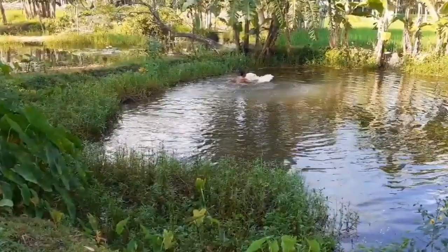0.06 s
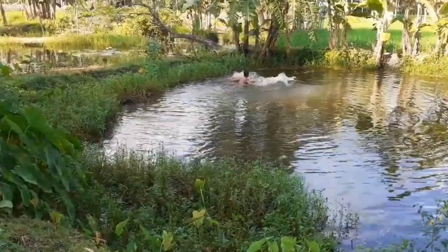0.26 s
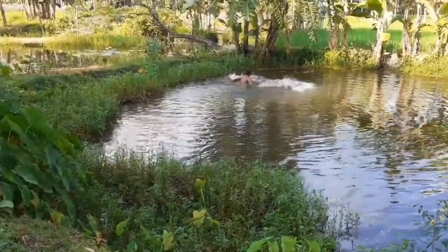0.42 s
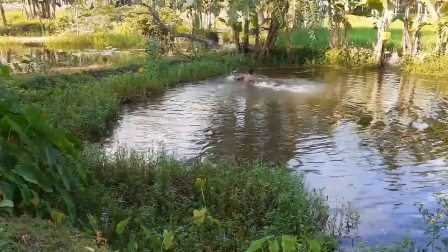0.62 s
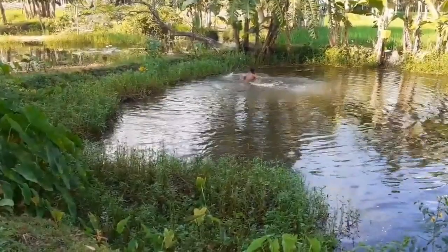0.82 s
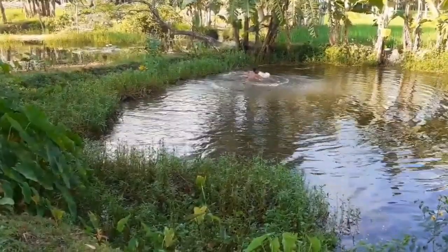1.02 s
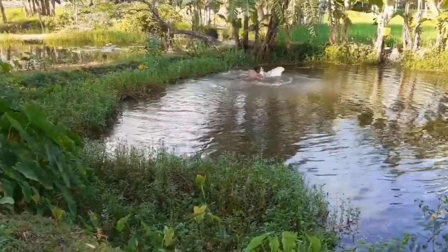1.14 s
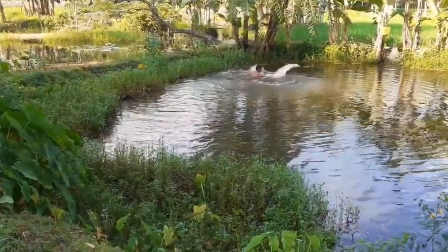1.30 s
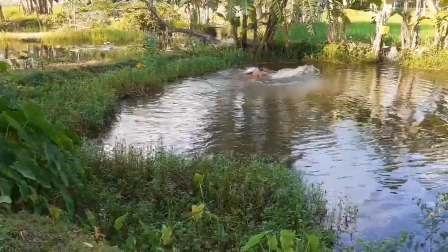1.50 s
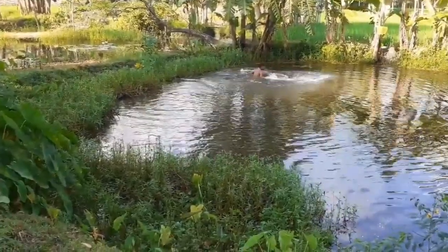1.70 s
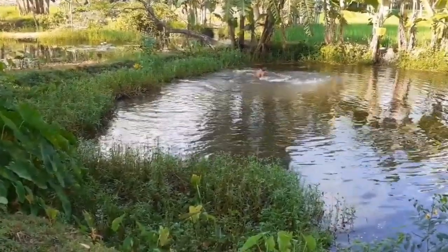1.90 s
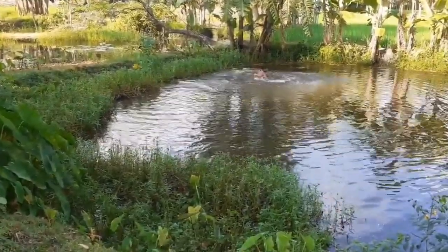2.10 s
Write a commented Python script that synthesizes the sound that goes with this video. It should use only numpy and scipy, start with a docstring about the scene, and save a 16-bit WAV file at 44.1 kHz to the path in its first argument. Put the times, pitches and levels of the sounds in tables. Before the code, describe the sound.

A swimmer splashes across a pond, with continuous churning, gurgles and plops. Near 0.5 seconds a kick makes a hollow thump and spray patters down. From about 0.8 seconds a faint insect trills on the left; another buzzes and a bird whistles upward on the right. A second kick thumps and sprays at 1.6 seconds. The water settles around 2 seconds over a soft low rumble.

```python
"""A swimmer on the far side of a pond, heard in stereo over a low outdoor rumble and a faint echo of trees.
A distant bird calls as the arms churn the water into bubbles. Near half a second a kick traps a pocket
of air that thumps, then throws up spray that patters back. An insect starts trilling on the left;
on the right another buzzes and a bird whistles a rising note that ends in an upward step. The second
kick thumps and sprays at 1.6 s, and the water settles under a last short buzz and a chirp."""
import sys
import numpy as np
from scipy import signal
from scipy.fft import rfft, irfft, next_fast_len
from scipy.io import wavfile
from scipy.ndimage import map_coordinates

SR = 44100
rng = np.random.default_rng(int(sys.argv[2]) if len(sys.argv) > 2 else 0)


def to_wav(s):
    """Save 16-bit WAV."""
    ch = np.atleast_2d(s).T  # columns
    pcm = np.round(np.clip(ch, -1, 1) * 32767)  # PCM
    wavfile.write(sys.argv[1], SR, pcm.astype(np.int16))


N = 94815
TIME = np.arange(N) / SR
LN_1000 = np.log(1000)  # exponent of a 60 dB decay


def air_pockets():
    """Air trapped under the surface rings like a large bubble, its pitch creeping up as it dies."""
    # ringing pockets (time [s], pitch [Hz], level [dB], t60 [s])
    pockets = [(0.204, 185, -46.5, 0.096), (0.316, 116, -50, 0.2), (0.386, 164, -48.5, 0.19),
               (0.427, 257, -28.5, 0.037), (0.439, 268, -20.5, 0.034), (.461, 266, -17, 0.039),
               (.479, 107.3, -30.5, 0.2), (0.504, 329.5, -44, 0.17), (0.749, 192, -54, 0.18),
               (.82, 109, -62.5, 0.32), (.99, 221, -51.5, 0.2), (1.071, 259.5, -43, .13),
               (1.134, 307.5, -40, 0.094), (1.178, 317, -35.5, 0.048), (1.205, 263, -35, 0.072),
               (1.246, 258, -29, 0.032), (1.402, 121, -48.5, 0.1), (1.485, 261, -41, 0.11),
               (1.581, 275.5, -28.5, 0.079), (1.592, 123, -22, 0.032), (1.602, 71.7, -46, 0.31),
               (1.66, 305, -22.5, 0.018)]
    attack_s, rise_per_t60 = 0.01, 0.027
    out = np.zeros(N)
    for start, hz, db, t60 in pockets:
        t = np.maximum(TIME - start, 0)
        envelope = 2 * (1 - np.exp(-t / attack_s)) * np.exp(-LN_1000 * t / t60)
        out += amp(db) * envelope * np.sin(2 * np.pi * hz * t * (1 + rise_per_t60 * t / t60 / 2))
    return out


def spray():
    """Water thrown by each kick patters back in clumps: coarse drops first, fine mist a little later."""
    # showers (time [s], hold [s], drop level [dB], mist lag [s], mist level [dB])
    showers = [(0.521, 0.059, -45, 0.013, -49.5), (1.647, 0.14, -47.5, 0.029, -48.5)]
    # tone of the coarse drops and of the mist (frequency [Hz], gain [dB])
    coarse_colour = [(500, -35), (1300, 6), (1650, -6.5), (2100, 6), (2600, -7), (3400, 4.5), (4300, -2),
                     (5500, -7), (8000, -14), (15500, -9)]
    mist_colour = [(3000, 3), (6000, -2), (8500, -2), (11000, -4.5), (13000, 1.5), (16000, 1.5)]
    coarse_gain = mist_gain = 0
    for start, hold, db, lag, mist_db in showers:
        coarse_gain += amp(db + swell(start, hold, rise_db_s=92, fall_db_s=80.5))
        mist_gain += amp(mist_db + swell(start + lag, hold_s=0.1, rise_db_s=81, fall_db_s=158))
    clumps = amp(3 * wobble(70.04))
    coarse = bubbles(coarse_colour, 1020, 12200, cycles=14, scatter_db=1.5, count=11000)
    mist = bubbles(mist_colour, 2930, 14600, cycles=7.5, scatter_db=3, count=14000)
    return clumps * coarse_gain * coarse + mist_gain * mist


def arm_strokes():
    """The arms stir up deep gurgles, churning bubbles, small drops and fizzing foam."""
    # loudness of each layer of water (time [s], level [dB])
    gurgle_level = [(0, -70), (.22, -58.5), (.3, -60), (.42, -56.5), (.53, -47.5), (.68, -67.5), (.78, -57),
                    (.89, -69), (.99, -56), (1.33, -58.5), (1.48, -52), (1.64, -48), (1.8, -55.5),
                    (1.93, -63.5), (2.05, -79)]
    churn_level = [(0, -60.5), (.23, -52.5), (.35, -56.5), (.5, -46), (.64, -52), (.76, -57), (.85, -64),
                   (.97, -56.5), (1.09, -50), (1.2, -53.5), (1.4, -55), (1.5, -49.5), (1.62, -48),
                   (1.76, -54.5), (1.9, -56), (2.0, -67.5), (2.15, -74.5)]
    drop_level = [(0, -53), (.2, -52), (.48, -55.5), (.68, -52.5), (.88, -62), (1.04, -59.5), (1.15, -56),
                  (1.86, -57), (1.95, -60.5), (2.15, -71)]
    foam_level = [(0, -77), (.34, -60), (.7, -63.5), (.9, -70), (1.25, -64.5), (1.5, -64.5), (1.85, -61.5),
                  (2.1, -77)]
    # tone of each layer (frequency [Hz], gain [dB])
    gurgle_colour = [(40, -50), (70, -10.5), (115, -6.5), (165, -6), (230, 0.5), (320, -0.5), (380, -10),
                     (600, 0)]
    churn_colour = [(250, -25), (390, -16), (490, 0), (650, 3), (850, 3), (980, -3), (1150, -2.5),
                    (1380, 0), (1600, -13.5), (2100, -4.5), (2500, -29), (5000, -53)]
    drop_colour = [(500, -19.5), (1300, 3.5), (1620, -5), (1900, 0), (2200, 2), (2550, -5), (3400, -0.5),
                   (4300, -1.5), (5300, -8), (8000, -16), (15500, -14.5)]
    foam_colour = [(4000, -19), (6500, 0.5), (9000, -1.5), (12500, 5.5), (16000, 6.5)]
    gurgle = bubbles(gurgle_colour, 79.7, 436, cycles=17.7, scatter_db=2.5, count=560)
    churn = bubbles(churn_colour, 365, 2510, cycles=16.8, scatter_db=1.5, count=2200)
    drops = bubbles(drop_colour, 955, 13300, cycles=8.1, scatter_db=-0.5, count=12000)
    foam = bubbles(foam_colour, 3800, 10300, cycles=3.1, scatter_db=2, count=9000)
    layers = [(gurgle, gurgle_level), (churn, churn_level), (drops, drop_level), (foam, foam_level)]
    return sum(layer * amp(curves(level)[0]) for layer, level in layers)


def bubbles(colour, lo_hz, hi_hz, cycles, scatter_db, count):
    """A stereo cloud of bubbles, rms 1: each rings, rises in pitch and fades 60 dB in `cycles` periods."""
    pair = []
    for _ in range(2):
        when, pitch, size, sign = rng.random((count, 4)).T[:, :, None]
        hz = lo_hz + (hi_hz - lo_hz) * pitch
        samples = np.arange(int(cycles * SR / lo_hz) // 2 + 2)
        age = samples * hz / SR / cycles
        gain = np.sign(sign - .5) * amp(-scatter_db * np.log(.01 + size)) * np.sqrt(hz)
        ring = gain * np.sin(2 * np.pi * cycles * age * (1 + age / 10)) * np.exp(-LN_1000 * age)
        slot = np.arange(count)[:, None] + 2 * when - 1  # even spacing with jitter
        start = (slot * N / count).astype(int).clip(0)
        cloud = np.bincount((start + samples).ravel(), ring.ravel(), N)[:N]
        pair.append(unit(cloud))
    return unit(spread(np.array(pair), colour))


def plops():
    """Lumps of water land: each rings one bubble inside a short splash around its pitch."""
    # landings (time [s], level [dB], pitch [Hz])
    landings = [(0.401, -38, 1280), (.44, -39.5, 658), (0.478, -34.5, 1145), (.497, -26, 3440),
                (.522, -37, 3470), (0.677, -35.5, 1203), (.683, -42, 695), (.738, -38.5, 1273),
                (.752, -39.5, 810), (.926, -41, 1136), (1.107, -39.5, 1246), (1.344, -38, 1076),
                (1.49, -41.5, 516), (1.616, -39.5, 431), (1.769, -32, 1890), (1.951, -49, 760),
                (2.043, -51, 1330)]
    ring_cycles, attack_s, splash_gain = 40, 0.0013, 0.56
    out = np.zeros((2, N))
    for start, db, hz in landings:
        t = np.maximum(TIME - start, 0)
        age = t * hz / ring_cycles
        splash_colour = [(hz / 4, -25), (hz, 0), (hz * 2, -12), (hz * 10, -30)]
        splash = unit(spread(rng.standard_normal((2, N)), splash_colour))
        ring = np.sin(2 * np.pi * hz * t * (1 + 0.044 * age))
        envelope = np.exp(-LN_1000 * age) * (1 - np.exp(-t / attack_s))
        out += amp(db) * envelope * (ring + splash_gain * splash)
    return out


def flicks():
    """Handfuls of droplets hit the pond, each in one short hiss."""
    # handfuls (time [s], level [dB], band centre [Hz], left minus right [dB])
    handfuls = [(.343, -59, 13500, 0), (0.631, -49, 4100, 2), (.785, -60, 13500, 0),
                (1.249, -55.5, 3280, -1)]
    out = np.zeros((2, N))
    for start, db, hz, pan_db in handfuls:
        envelope = amp(db + swell(start, hold_s=0, rise_db_s=700, fall_db_s=600))
        out += noise_band(hz, width_hz=.22 * hz) * pan(pan_db) * envelope
    return out


def drop_tick():
    """One drop strikes the surface with a crisp click, right of centre."""
    start_s, level_db, t60_s = 1.2478, -46, .012
    t = TIME - start_s
    envelope = (t >= 0) * amp(level_db) * np.exp(-LN_1000 * np.abs(t) / t60_s)
    return envelope * rng.standard_normal((2, N)) * pan(-4)


def birds():
    """Off to the right, a thin, unsteady rising whistle and a few short, blurred bird notes."""
    # course of the whistle (time [s], pitch [Hz], level [dB])
    course = [(.99, 3880, -75), (1.04, 3890, -71), (1.12, 3920, -66), (1.17, 4080, -76), (1.205, 4220, -61),
              (1.23, 4260, -65), (1.33, 4340, -62), (1.4, 4460, -69)]
    # short blurred notes: distant calls, the whistle's final upward step and a closing chirp
    # (time [s], length [s], pitch [Hz], glide [Hz/s], level [dB])
    short_notes = [(0, .02, 3150, 0, -62), (.07, .06, 3270, 0, -61), (1.402, .045, 4900, 4500, -67),
                   (2.085, .045, 4400, 18000, -76)]
    flutter_db, wander_hz, blur_hz, fade_db_s = 2, 29.4, 160, 500
    hz, db = curves(course)
    first, last = course[0][0], course[-1][0]
    gate_db = swell(first, last - first, fade_db_s, fade_db_s)
    envelope = amp(db + gate_db + flutter_db * wobble(58.9))
    whistle = envelope * tone(hz + wander_hz * wobble(300))
    notes = np.zeros(N)
    for start, length, pitch, glide, level in short_notes:
        note_hz = pitch + glide * np.clip(TIME - start, 0, length) + blur_hz * wobble(700)
        notes += tone(note_hz) * amp(level + swell(start, length, fade_db_s, fade_db_s))
    return (whistle + foliage(notes)) * pan(-5)


def insect_trill():
    """An insect in the leaves on the left: bursts climb and swell, each wing stroke a falling chirp."""
    # bursts (time [s], length [s], level [dB])
    bursts = [(.81, 0.094, -70.5), (0.992, 0.14, -69.5), (1.236, .145, -69), (1.5, .12, -68)]
    pitch_hz, climb_hz, sweep_hz, blur_hz, strokes_per_s = 10450, 130, 900, 130, 102
    stroke = (strokes_per_s * TIME) % 1
    out = np.zeros((2, N))
    for start, length, db in bursts:
        progress = np.clip((TIME - start) / length, 0, 1)
        hz = pitch_hz + climb_hz * progress + sweep_hz * (.5 - stroke) + blur_hz * wobble(1200)
        chirps = unit(np.sin(np.pi * stroke) ** 2 * tone(hz))
        envelope = amp(db + swell(start + length / 2, length / 2, rise_db_s=80, fall_db_s=1200))
        out += foliage(chirps * envelope)
    return out * pan(4.5)


def insect_buzz():
    """Another insect, on the right, gives smooth, high buzzes."""
    # buzzes (time [s], length [s], level [dB], left minus right [dB])
    buzzes = [(1.02, 0.08, -70.5, -5), (1.99, 0.17, -74, -4)]
    out = np.zeros((2, N))
    for start, length, db, pan_db in buzzes:
        envelope = amp(db + swell(start, length, rise_db_s=200, fall_db_s=200))
        out += noise_band(7830, width_hz=70) * pan(pan_db) * envelope
    return out


def foliage(call):
    """Leaves smear a call: the direct sound and a brief scatter, different on each side."""
    t60_s, scatter_db = .03, -6
    t = np.arange(SR // 10) / SR
    tail = rng.standard_normal((2, len(t))) * np.exp(-LN_1000 * t / t60_s)
    paths = (t == 0) + amp(scatter_db) * tail / np.linalg.norm(tail[0])
    return signal.fftconvolve(call[None], paths / np.linalg.norm(paths[0]), axes=1)[:, :N]


def bank_echo(sound):
    """The trees on the bank return a short, diffuse echo, thin in the bass."""
    t60_s, build_s = .35, 0.0032
    t = np.arange(SR // 2) / SR
    tail = rng.standard_normal((2, len(t))) * np.exp(-LN_1000 * t / t60_s) * (1 - np.exp(-t / build_s))
    echo = signal.fftconvolve(sound.mean(0)[None], tail / np.linalg.norm(tail[0]), axes=1)[:, :N]
    return spread(echo, colour=[(100, -12), (350, -12.5), (1200, -2), (12000, -8)])


def outdoor_air():
    """The ambience at the pond: a steady low rumble and a faint hiss."""
    # tone of the ambience (frequency [Hz], gain [dB])
    colour = [(20, -14), (45, 3), (200, -3), (400, -38), (800, -23), (1300, 3), (2600, -12), (4300, -9),
              (6500, -3.5), (15500, -10)]
    return amp(-67) * unit(spread(rng.standard_normal((2, N)), colour))


def spread(pair, colour):
    """Two unrelated signals become a coloured stereo image, narrow in the bass and wide in the treble."""
    # how alike the two channels are (frequency [Hz], likeness [0-1])
    likeness = [(100, 0.92), (700, 0.87), (1400, 0.63), (2800, 0.22), (5600, 0.08), (11000, 0)]

    def mid_side_gains(hz):
        angle = np.arccos(np.clip(along(likeness, hz), -1, 1)) / 2
        return amp(along(colour, hz)) * [np.cos(angle), np.sin(angle)]

    mid, side = filtered(pair, mid_side_gains)
    return np.array([mid + side, mid - side])


def amp(db):
    """Decibels to gain."""
    return 10 ** (np.asarray(db) / 20)


def unit(x):
    """Scale to rms 1."""
    return x / np.sqrt(np.mean(x ** 2) + 1e-20)


def pan(db):
    """Channel gains that put the left db above the right."""
    return amp(np.array([[.5], [-.5]]) * db)


def swell(start, hold_s, rise_db_s, fall_db_s):
    """A level in dB that rises to 0 at start, holds, then falls."""
    return -rise_db_s * np.maximum(start - TIME, 0) - fall_db_s * np.maximum(TIME - start - hold_s, 0)


def along(points, hz):
    """Interpolate (frequency [Hz], value) points on a log axis."""
    freqs, values = np.transpose(points)
    return np.interp(np.log(hz + 1), np.log(freqs + 1), values)


def curves(rows):
    """One value per sample for each column after the time."""
    times, *columns = np.transpose(rows)
    return [np.interp(TIME, times, column) for column in columns]


def wobble(rate):
    """A smooth random curve, rate knots a second."""
    return map_coordinates(rng.standard_normal(int(N * rate / SR) + 4), [TIME * rate])


def tone(hz):
    """A sine that follows a pitch curve, rms 1."""
    return np.sqrt(2) * np.sin(2 * np.pi * np.cumsum(hz) / SR)


def noise_band(hz, width_hz):
    """Stereo noise in one band, rms 1."""
    return unit(filtered(rng.standard_normal((2, N)), lambda f: 1 / (1 + ((f - hz) / width_hz) ** 4)))


def filtered(x, response):
    """Filter x by a gain that is a function of frequency."""
    size = next_fast_len(N + SR // 2)
    return irfft(rfft(x, size) * response(np.fft.rfftfreq(size, 1 / SR)), size)[..., :N]


def scene():
    """Swimmer and birds carry across the pond with their echo, over insects and open air."""
    direct = arm_strokes() + spray() + flicks() + air_pockets() + plops() + drop_tick() + birds()
    air = outdoor_air()
    return direct + amp(-7) * bank_echo(direct) + insect_trill() + insect_buzz() + air


def record(dry):
    """The microphone thins the deepest bass, leans left in the high treble and cuts off the very top."""
    # balance at the microphone (frequency [Hz], left minus right [dB])
    balance = [(100, -0.8), (700, 0.8), (2400, -0.5), (5500, -0.9), (8300, 4), (14000, 1.5)]
    low_cut_hz, top_hz = 50, 15780
    thinned = signal.sosfilt(signal.butter(2, low_cut_hz, "high", fs=SR, output="sos"), dry)
    return filtered(thinned, lambda hz: pan(along(balance, hz)) * (hz < top_hz))


dry = scene()
out = record(dry)
to_wav(out)
```